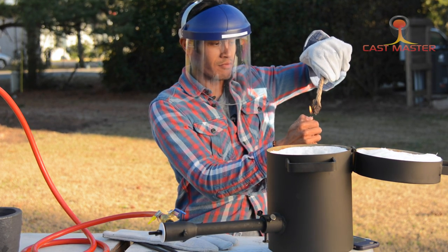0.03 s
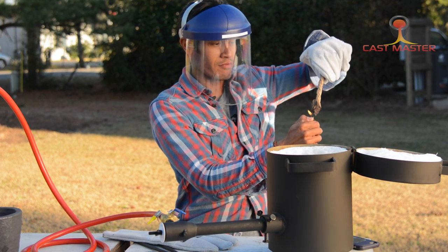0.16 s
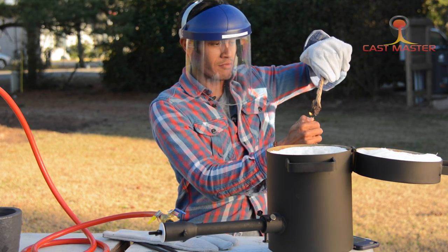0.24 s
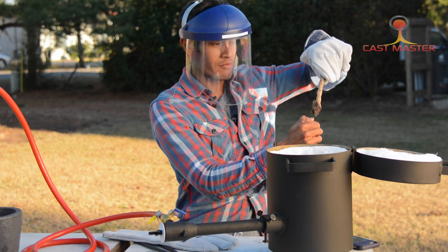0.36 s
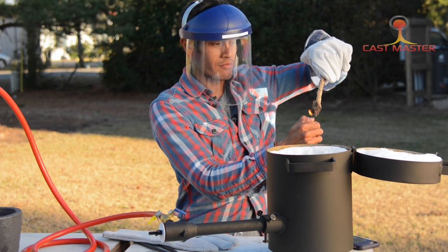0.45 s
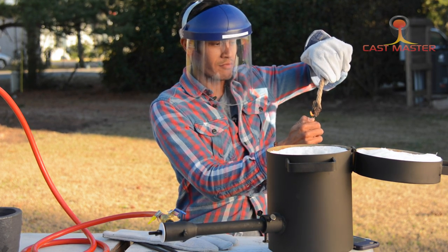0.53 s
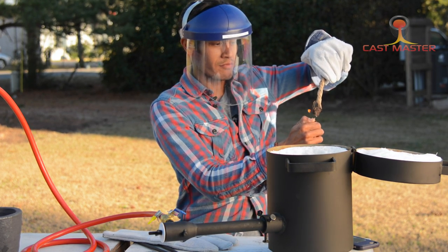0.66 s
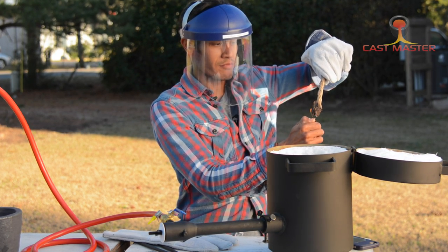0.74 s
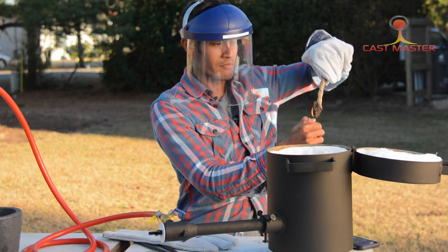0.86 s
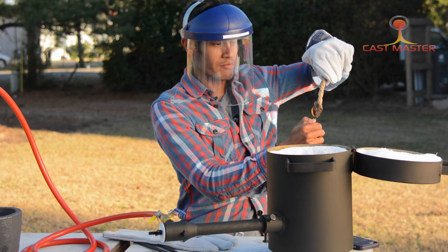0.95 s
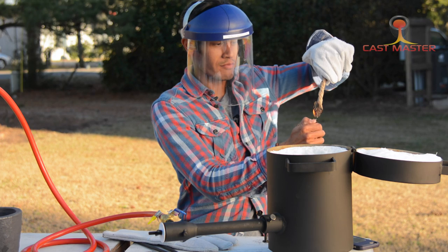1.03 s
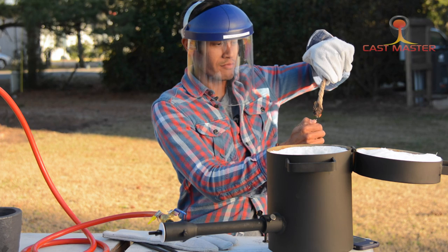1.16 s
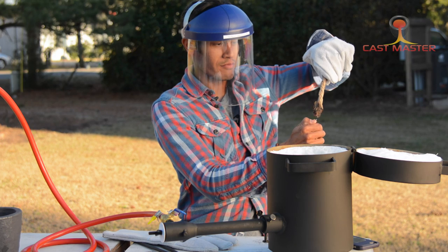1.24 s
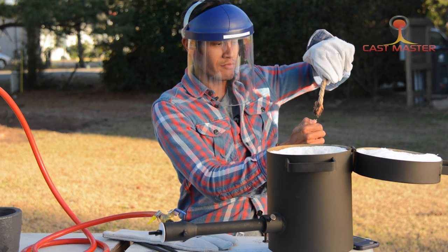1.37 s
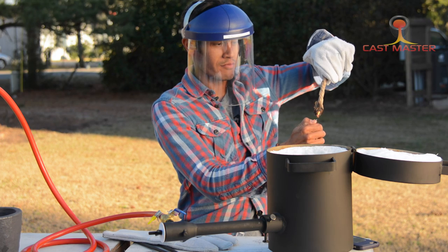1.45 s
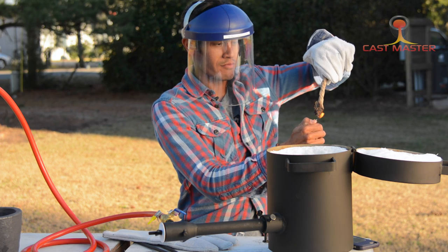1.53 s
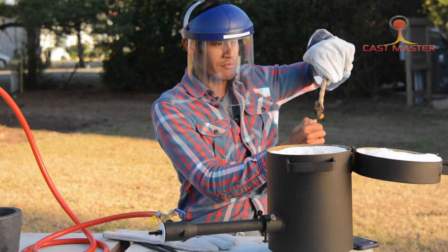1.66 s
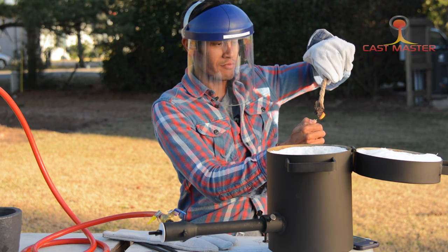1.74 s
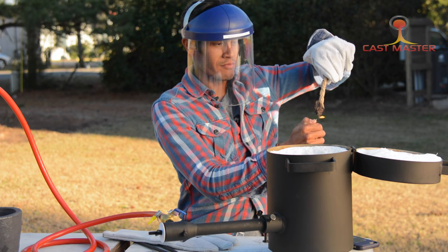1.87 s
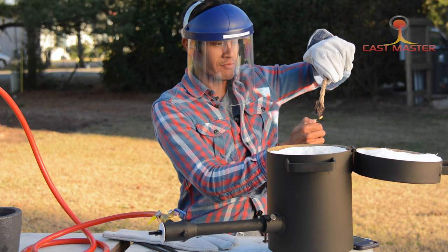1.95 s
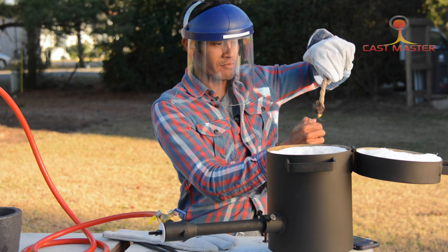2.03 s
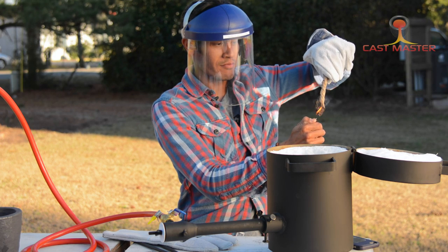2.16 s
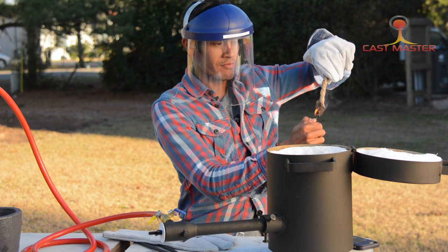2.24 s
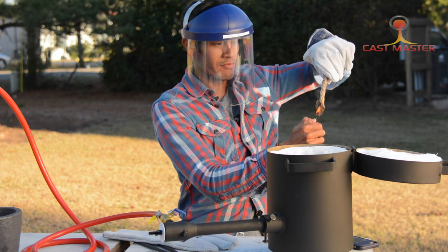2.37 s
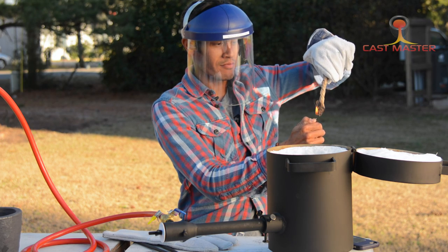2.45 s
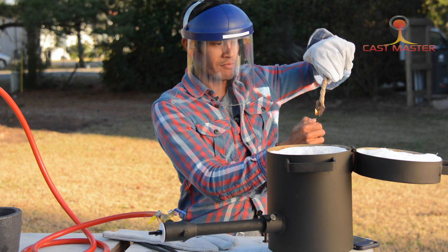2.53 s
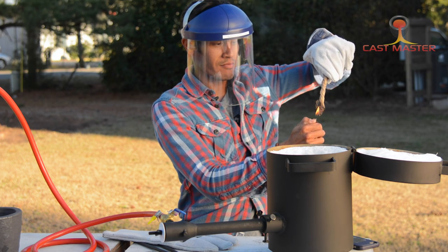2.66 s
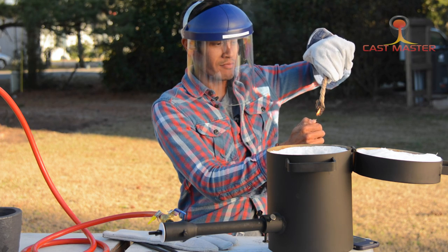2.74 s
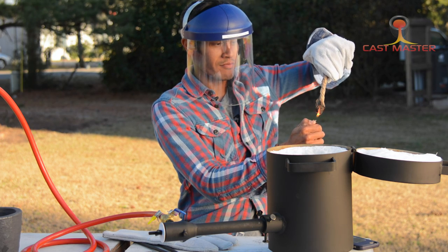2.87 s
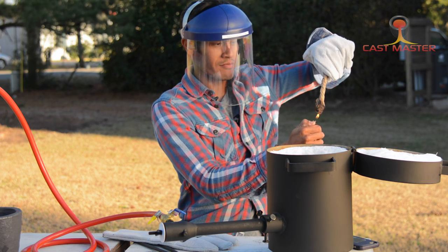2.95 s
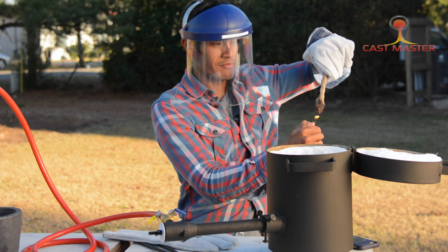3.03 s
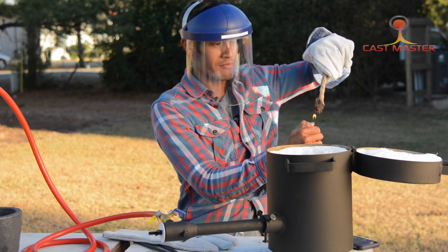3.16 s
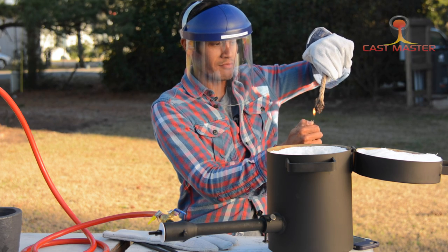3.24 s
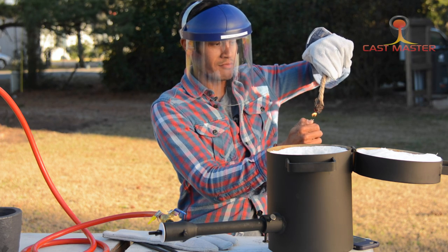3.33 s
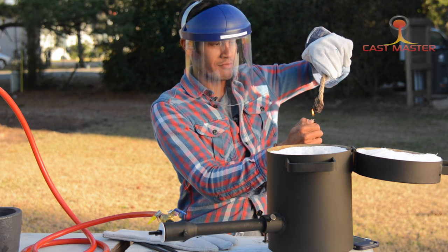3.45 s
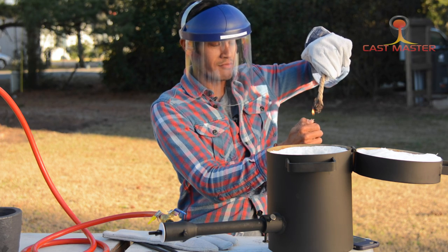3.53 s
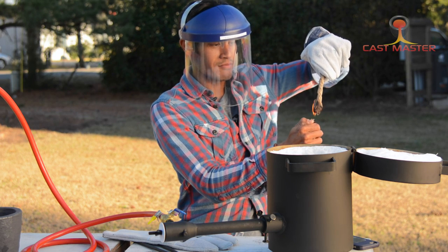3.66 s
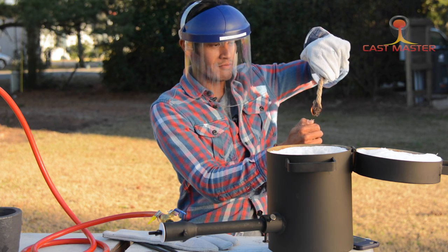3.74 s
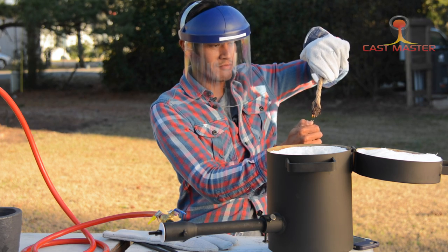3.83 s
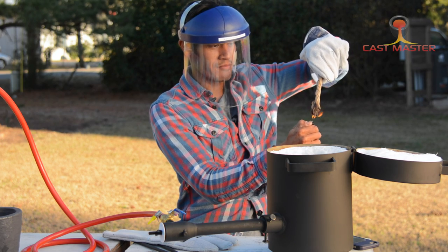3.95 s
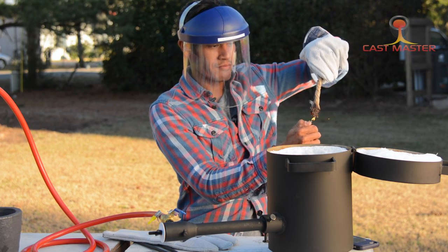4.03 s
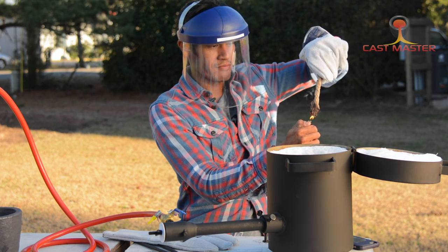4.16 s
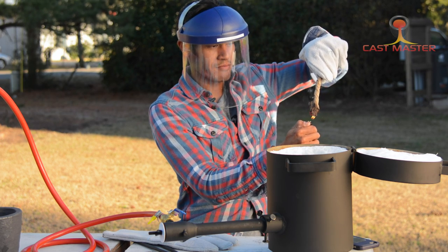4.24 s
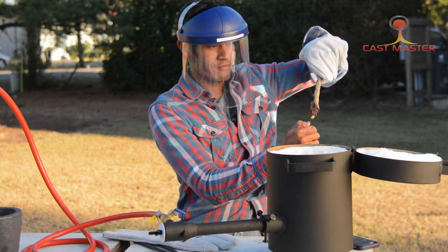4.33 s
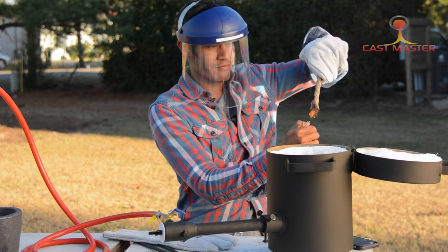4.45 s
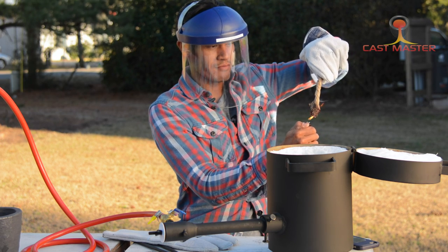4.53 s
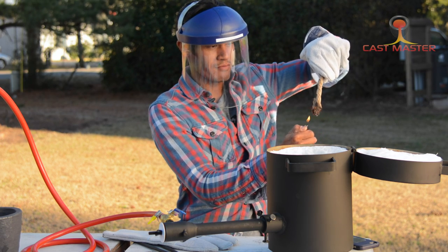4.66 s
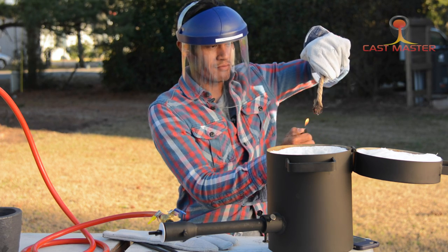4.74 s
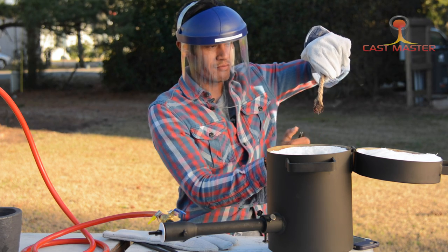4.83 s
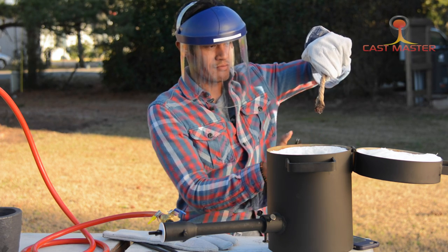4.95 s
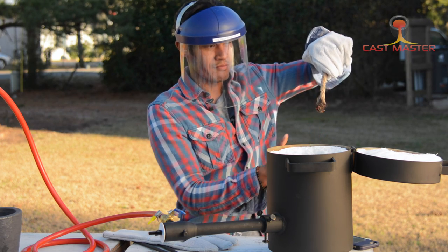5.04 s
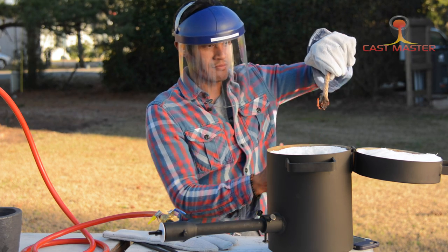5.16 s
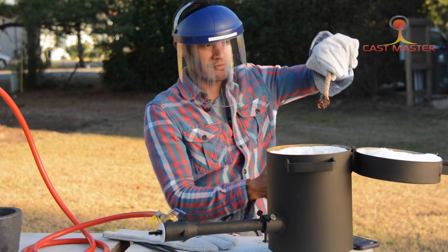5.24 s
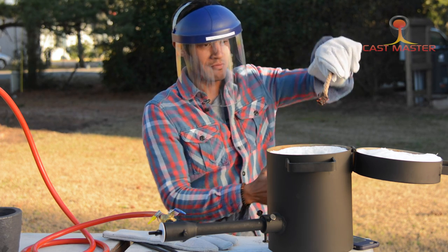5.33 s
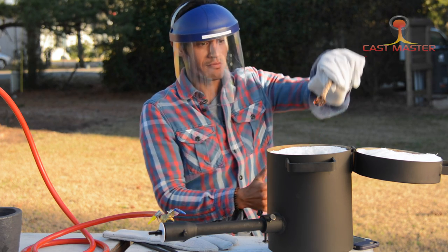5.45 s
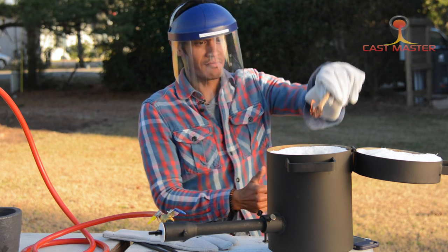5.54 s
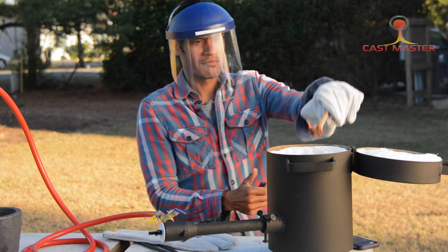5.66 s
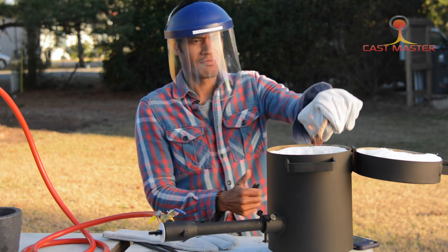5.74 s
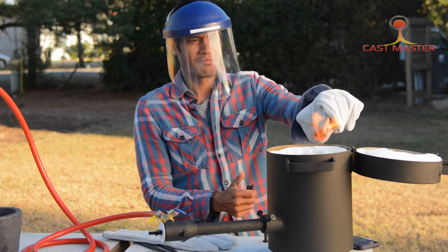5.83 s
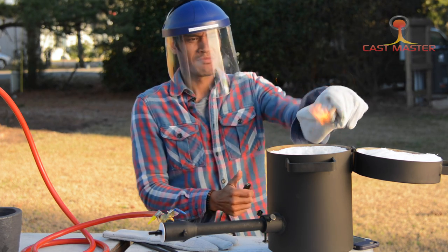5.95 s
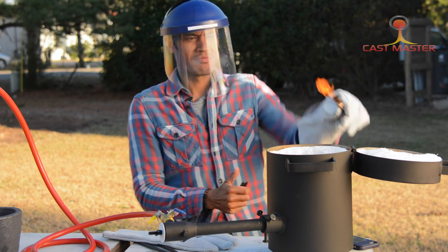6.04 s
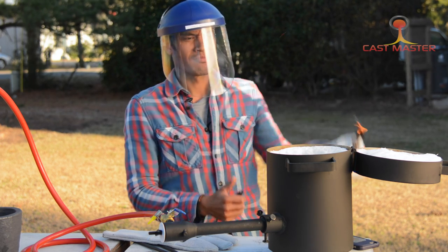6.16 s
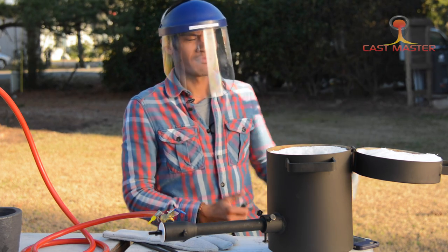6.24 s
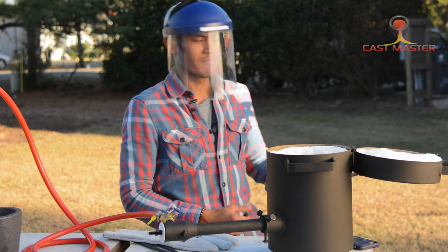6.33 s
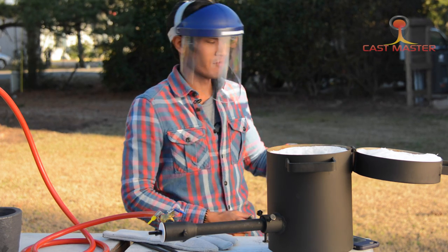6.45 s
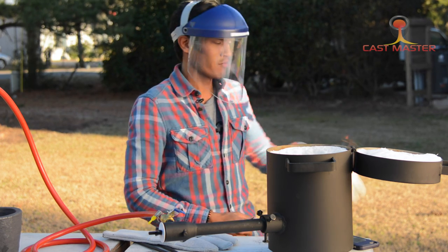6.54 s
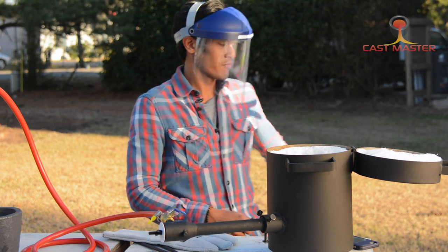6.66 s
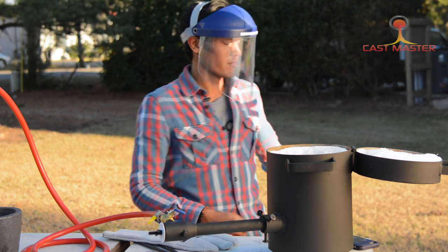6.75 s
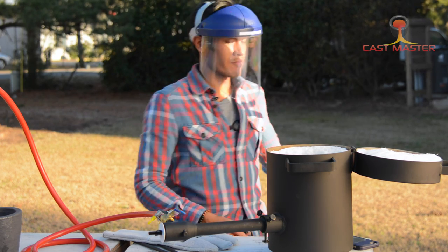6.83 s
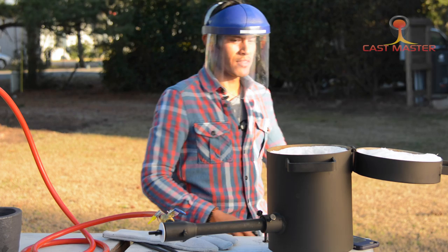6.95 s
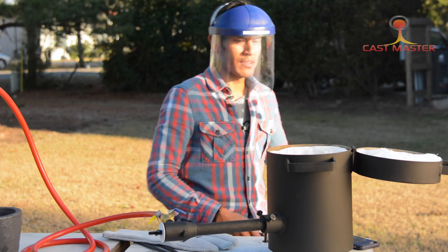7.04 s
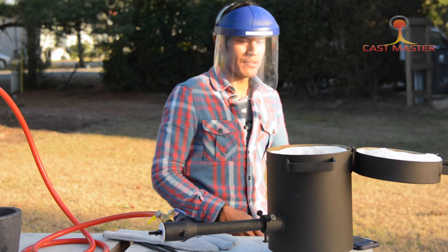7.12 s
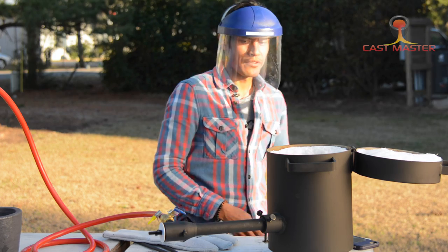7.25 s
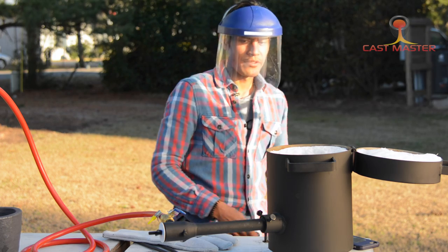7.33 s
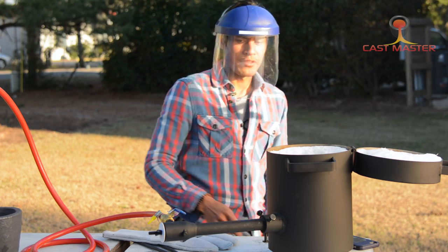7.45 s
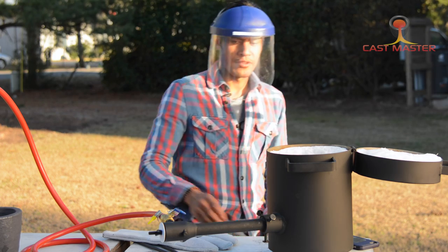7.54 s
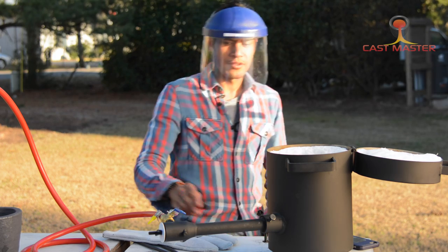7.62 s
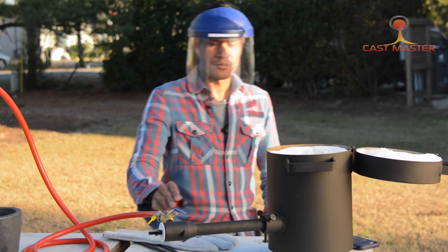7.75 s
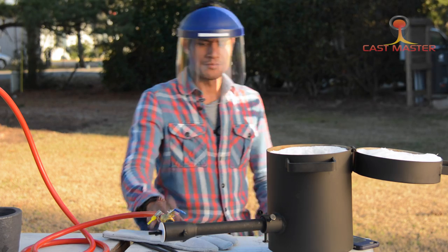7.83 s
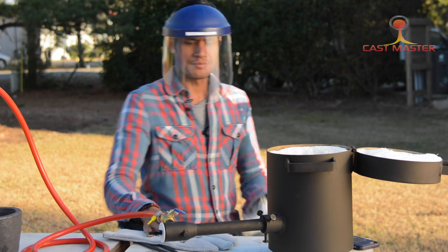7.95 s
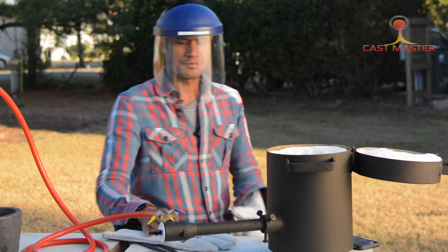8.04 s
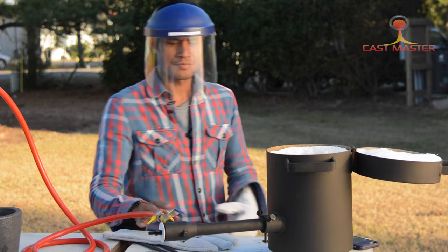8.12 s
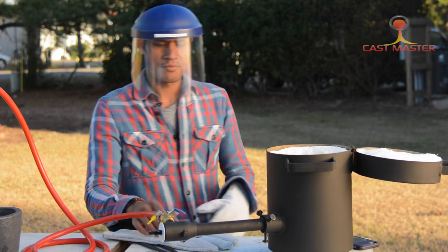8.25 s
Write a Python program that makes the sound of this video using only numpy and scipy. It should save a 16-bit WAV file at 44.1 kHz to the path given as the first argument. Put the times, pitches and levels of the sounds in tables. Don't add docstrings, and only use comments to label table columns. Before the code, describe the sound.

Open air, dry and close. From 0 to 5 seconds it is very quiet: raw gas hisses thinly through a burner tube, bright with faint ringing tones, over a smooth distant traffic rumble. A barely audible falling bird chip comes at 0.4 and a clearer rising one at 0.8. From about 5 the hiss grows stirred and uneven as a body leans near; a small tick sounds at 5.3. A faint lick of flame begins near 5.75, then at 5.97 the gas catches abruptly with a short, dull whump. The flame dips, flares again around 6.3, and puffs rapidly inside the metal hollow. By 7 it settles slightly into a low, boxy, fluttering roar, dominated by bass and low mids, with hiss above. Crisp little brass ticks cluster at 7.1 to 7.35, with fainter ones near 7.9. The roar swells slightly at the end, 8.3.

```python
import sys
import numpy as np
from scipy import signal
from scipy.fft import rfft, irfft, next_fast_len
from scipy.io import wavfile
from scipy.ndimage import uniform_filter1d

SR = 44100
rng = np.random.default_rng(int(sys.argv[2]) if len(sys.argv) > 2 else 0)


def digitize_waveform(pressure):
    field = np.atleast_2d(pressure).T
    bounded = np.clip(field, -1, 1)
    quanta = np.round(bounded * 32767).astype(np.int16)
    wavfile.write(sys.argv[1], SR, quanta)


def elevation(decibels):
    levels = np.asarray(decibels, float)
    return 10 ** (levels / 20)


N = 365588
FAST = next_fast_len(N)
STEP = 32
SLOW_S = np.arange(0, N + STEP, STEP) / SR
LEANING_S = (6.8, 0.4)

# time in seconds, roar level in dB.
FLAME = [
    (5.6, -79),
    (5.74, -60),
    (5.85, -53),
    (5.96, -27),
    (6.1, -29),
    (6.28, -26),
    (7.1, -30.5),
    (8.1, -29),
    (8.29, -26),
]
# middle in seconds, lift in dB, length in seconds.
PUFFS = [(5.978, 4, 0.013), (6.086, 5, 0.013), (6.186, 0.5, 0.014), (6.255, 2, 0.027), (6.401, 3, 0.012),
         (6.493, 1.5, 0.011), (6.535, 2.5, 0.0095), (6.734, 4.5, 0.009), (6.845, 10, 0.0076),
         (7.006, 7, 0.0092), (7.126, 6, 0.0063), (7.23, 3.5, 0.01), (7.356, 3.5, 0.01), (7.494, 0, 0.015),
         (7.571, 3, 0.0092), (7.65, 0, 0.0078), (7.707, 5, 0.0095), (7.955, 4.5, 0.019), (8.09, 8, 0.0077),
         (8.217, 4.5, .015)]
# centre in Hz, width in Hz, level in dB.
HOLLOW = [(233.5, 83, -5), (303.8, 82, 0.5), (356.5, 91, -0.5), (474.7, 132, -10)]
# centre in Hz, width in Hz, level in dB, change in dB once warm.
HOLLOW_UPPER = [(778, 155, 2.5, -1), (905, 128, -3, 1.5), (1030, 290, -6, -1.5), (1210, 160, -18.5, 1.5),
                (1366, 130, -18, 6.5), (1750, 90, -12, -1.5), (1880, 88, -18.5, -2)]
# centre in Hz, width in Hz, level in dB.
HOLLOW_BASS = [(166.8, 76, 11), (118.5, 27, -6)]


def flame():
    roar_db, = curves(FLAME)
    full_roar_db = -29

    def edge_db(small_db, full_db, share):
        levelled_db = full_db + share * (roar_db - full_roar_db)
        return np.minimum(roar_db + small_db, levelled_db)

    upper_db = edge_db(small_db=-3, full_db=-53, share=0.4)
    bass_db = edge_db(small_db=-2, full_db=-40.5, share=0.13)
    surge = gain(bumps(PUFFS) + 1.22 * walk(25))

    mouth = signal.butter(8, 569, fs=SR, output="sos")
    body = signal.sosfilt(mouth, modes(HOLLOW, 1.35, 12, steep=1.26))
    bass = signal.sosfilt(mouth, modes(HOLLOW_BASS, 0.9, 8, steep=1.14))
    upper = modes(HOLLOW_UPPER, 0.98, 10, steep=1.1, change=ramp(start_s=6.1, length_s=0.28))
    upper_band = signal.butter(4, [720, 2000], "band", fs=SR, output="sos")
    upper = signal.sosfilt(upper_band, upper)

    low = elevation(roar_db) * level(evened(body, 0.49, 0.022), -1.67)
    low = low + elevation(bass_db) * level(evened(bass, 0.67, 0.032), -1.3)
    high = elevation(upper_db) * level(upper, -1.73)
    lit = np.clip((np.arange(N) / SR - FLAME[0][0]) / 0.12, 0, 1)
    return lit * (surge * low + surge ** 0.38 * high)


# frequency in Hz, density in dB per Hz.
THUMP = [(40, -30), (90, 0.5), (450, 1.5), (620, -17), (800, -12.5), (1200, -42), (1750, -39), (4500, -74)]


def thump():
    middle_s, length_s, burst_db = 5.979, 0.015, -26
    u = (np.arange(N) / SR - middle_s) / length_s
    envelope = np.exp(-np.where(u < 0, u, u / 1.6) ** 2)
    return level(evened(coloured(THUMP), 1.0, 0.0073), burst_db) * envelope


# time in seconds, level in dB.
JET = [
    (4.6, -92.5),
    (5.0, -80),
    (5.35, -72),
    (6.1, -67),
    (6.5, -67.5),
    (7.3, -68),
    (7.7, -71),
    (8.1, -69.5),
    (8.29, -64.5),
]
# centre in Hz, width in Hz, level in dB.
TUBE_STILL = [(3050, 90, -7), (3270, 110, -6), (3600, 150, -10), (3810, 110, -9), (4570, 190, -16),
              (5070, 94, -12), (5590, 120, -9), (6250, 90, -14), (6720, 64, -8), (7990, 110, -8),
              (8350, 200, -11), (8760, 90, -7), (9000, 120, -10), (9500, 60, -8), (9760, 130, 0),
              (9960, 80, -7), (10350, 300, -8), (11100, 250, -5), (11400, 120, -2), (12600, 81, -5),
              (12850, 120, -8), (13300, 300, -13), (13720, 120, -10), (13950, 120, -11), (14490, 130, -8),
              (15400, 50, -20)]
# centre in Hz, width in Hz, level in dB, change in dB once the body leans away.
TUBE_STIRRED = [(2410, 110, -3, 2), (2990, 160, -2, 1.5), (3414, 74, -1.5, -2), (5100, 99, -0.5, -5),
                (5700, 240, -4.5, -4), (6290, 78, 0, -7), (6750, 100, -1, 1.5), (8000, 200, 2, -1),
                (8920, 120, -1.5, 0), (9780, 220, 2, -0.5), (10350, 130, -3, -6), (11350, 110, -1, 2),
                (11600, 120, -1, -8), (12700, 130, -2.5, -3.5)]
# frequency in Hz, density in dB per Hz.
HISS_STILL = [(2000, -10), (2800, -15), (4300, -22.5), (5900, -15.5), (7400, -21.5), (8500, -14.5),
              (10000, -12), (12000, -14), (13500, -16), (15000, -20), (16000, -37)]
# frequency in Hz, density in dB per Hz.
HISS_STIRRED = [(1500, -21), (2100, -4), (3000, -11), (4200, -10), (5400, -16.5), (7200, -13.5),
                (8500, -6.5), (10500, -4), (12000, -8.5), (13500, -15.5), (16000, -9.5)]
# middle in seconds, lift in dB, length in seconds.
WHISTLE_SWELLS = [
    (4.7, -4, .15),
    (5.14, 5, .08),
    (5.9, 11, 0.27),
    (6.27, 11, .15),
    (8.0, 12, .07),
]


def jet():
    still = modes(TUBE_STILL, 0.9, 4, steep=5.0) + coloured(HISS_STILL)
    still_gain = gain(-72 - 7 * ramp(start_s=5.22, length_s=0.32))

    stirred_db, = curves(JET)
    stirred = modes(TUBE_STIRRED, 2.7, 8, steep=4.0, change=ramp(*LEANING_S))
    stirred = stirred + patchy(coloured(HISS_STIRRED), 2.4, 8)
    dull = signal.sosfiltfilt(signal.butter(2, 4200, fs=SR, output="sos"), stirred)
    unlit = 1 - ramp(start_s=5.75, length_s=0.2)
    stirred = stirred - dull * (1 - gain(-7.5 * unlit))

    whistle = modes([(13830, 61, 0)], 2.1, 9.9, steep=3.0)
    whistle_gain = gain(-83.5 - 4 * ramp(*LEANING_S) + bumps(WHISTLE_SWELLS))
    hiss = still_gain * level(still, 0) + elevation(stirred_db) * level(stirred, 0)
    return hiss + whistle_gain * level(whistle, 0)


# start in seconds, peak level in dB, ring in Hz, dull share from 0 to 1.
TICKS = [(5.342, -57, 7400, 0.13), (5.343, -62, 5000, 0), (6.021, -56.5, 4900, 0), (7.12, -62.5, 7900, 0),
         (7.146, -49.5, 7400, 0.03), (7.149, -55, 5000, .05), (7.214, -52.5, 7950, 0),
         (7.238, -59, 7900, 1.15), (7.350, -55.5, 8200, .05), (7.353, -57.5, 4200, 0),
         (7.868, -62.5, 6200, 0.1), (7.95, -70.5, 5500, .1)]


def ticks():
    out, t = np.zeros(N), np.arange(900) / SR
    grits = rng.standard_normal((len(TICKS), len(t)))
    knock = 5 * sum(np.sin(2 * np.pi * hz * t) * (1200 / hz) ** 2 for hz in (1200, 1700, 2300, 3100))
    knock = knock * np.exp(-t / 0.0025)
    for (s, db, hz, dull), grit in zip(TICKS, grits):
        strike = (2 * (t == 0) + grit) * np.exp(-t / 0.0012)
        crack = ring(ring(strike, hz, 6000), 5800, 9000)
        tone = 0.86 * np.sin(2 * np.pi * hz * t) * np.exp(-t / 0.001)
        i = int(s * SR)
        out[i:i + len(t)] += elevation(db) * (crack + tone + dull * knock)
    return out


# start in seconds, length in seconds, start pitch in Hz, end pitch in Hz, level in dB.
CHIPS = [
    (0.41, .028, 7950, 7650, -75),
    (.833, .032, 6100, 8050, -66),
]


def bird():
    out = np.zeros(N)
    for s, length, start_hz, end_hz, db in CHIPS:
        u = np.linspace(0, 1, int(length * SR))
        hz = end_hz + (start_hz - end_hz) * (1 - u) ** 1.7
        swell = np.sin(np.pi * u ** 1.7)
        i = int(s * SR)
        out[i:i + len(u)] += elevation(db) * swell * np.sin(2 * np.pi * np.cumsum(hz) / SR)
    return out


# frequency in Hz, density in dB per Hz.
TOWN = [(18, -56.5), (30, -31.5), (64, -12), (128, 1), (316, -2), (538, -9), (731, -19.5), (861, -9),
        (1200, -17), (1380, -15), (4000, -35.5), (5200, -56), (8800, -120)]
# centre in Hz, width in Hz, level in dB.
TOWN_HUMPS = [(128.3, 65, -2.5), (545, 165, -6), (882, 122, -8.5), (1048, 102, -12), (1387, 230, -16.5),
              (1649, 38, -18)]


def town():
    humps = modes(TOWN_HUMPS, 0.8, 4, steep=2.7)
    rumble = level(coloured(TOWN), -4.5) + level(humps, -3.5)
    return gain(0.3 * walk(1.2)) * level(rumble, -63)


def modes(table, flicker_db, rate, steep, change=0):
    out, eddies = 0, (noise(), noise(), noise())
    for k, (hz, width_hz, db, *change_db) in enumerate(table):
        x = ring(eddies[k % len(eddies)], hz, width_hz)
        x = ring(x, hz, steep * width_hz)
        mode_db = db + sum(change_db) * change + flicker_db * walk(rate)
        out = out + gain(mode_db) * x
    return out


def ring(x, hz, width_hz):
    return signal.lfilter(*signal.iirpeak(hz, hz / width_hz, fs=SR), x)


def noise():
    return rng.standard_normal(N)


def coloured(points):
    hz, db = np.transpose(points)
    f = np.maximum(np.arange(FAST // 2 + 1) * SR / FAST, 1)
    shape = elevation(np.interp(np.log(f), np.log(hz), db, left=-120, right=-120))
    return irfft(rfft(noise(), FAST) * shape, FAST)[:N]


def patchy(x, db, rate):
    spectrum, out = rfft(x, FAST), 0
    place = 4 * np.log2(np.arange(1, FAST // 2 + 2) * SR / FAST / 1500)
    for k in range(15):
        band = np.clip(1 - np.abs(place - k), 0, 1)
        out = out + gain(db * walk(rate)) * irfft(spectrum * band, FAST)[:N]
    return out


def evened(x, share, span_s):
    k = int(span_s * SR)
    power = uniform_filter1d(uniform_filter1d(x ** 2, k), k)
    return x / (power + 1e-12) ** (np.clip(share, 0, 1) / 2)


def level(x, db):
    return x * elevation(db) / np.sqrt(np.mean(x ** 2))


def curves(table):
    s, *columns = np.transpose(table)
    return [np.interp(np.arange(N) / SR, s, c) for c in columns]


def walk(rate):
    k = int(SR / STEP / rate)
    held = np.repeat(rng.standard_normal(len(SLOW_S) // k + 1), k)
    return 1.22 * uniform_filter1d(uniform_filter1d(held, k), k)[:len(SLOW_S)]


def gain(slow_db):
    return uniform_filter1d(np.repeat(elevation(slow_db), STEP), STEP)[:N]


def ramp(start_s, length_s):
    return np.clip((SLOW_S - start_s) / length_s, 0, 1)


def bumps(events):
    return sum(db * np.exp(-((SLOW_S - s) / length) ** 2) for s, db, length in events)


def scene():
    roar = signal.sosfilt(signal.butter(4, 88, "high", fs=SR, output="sos"), flame())
    burst = signal.sosfilt(signal.butter(2, 50, "high", fs=SR, output="sos"), thump())
    return (roar + burst + jet() + town() + ticks() + bird())[None]


def roll_off(x):
    return signal.sosfilt(signal.butter(12, 15720, fs=SR, output="sos"), x)


def record(dry):
    mix = signal.sosfilt(signal.butter(2, 45, "high", fs=SR, output="sos"), dry)
    return roll_off(mix)


dry = scene()
out = record(dry)
digitize_waveform(out)
```